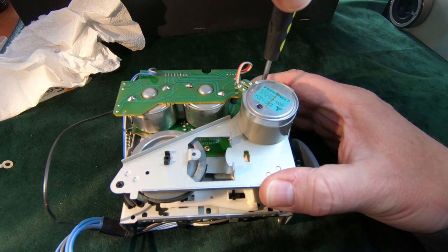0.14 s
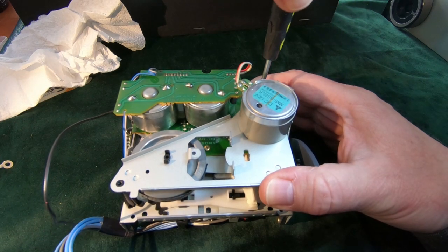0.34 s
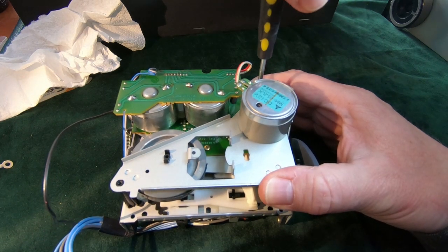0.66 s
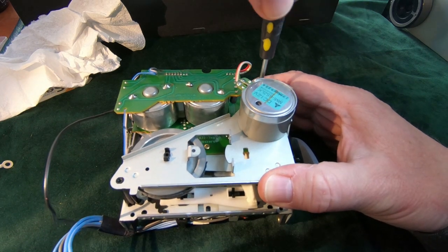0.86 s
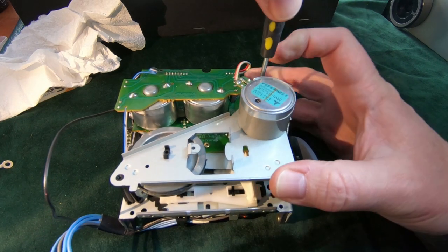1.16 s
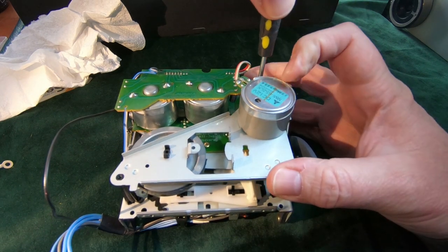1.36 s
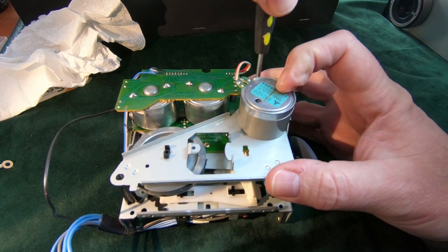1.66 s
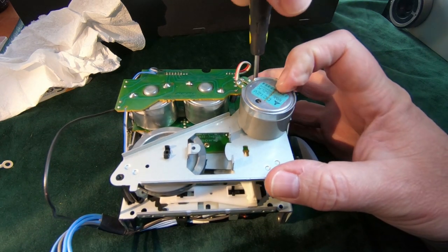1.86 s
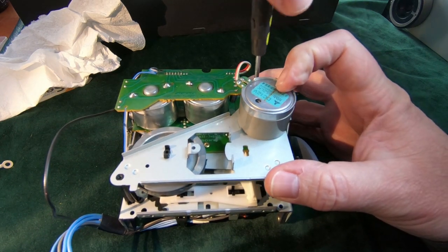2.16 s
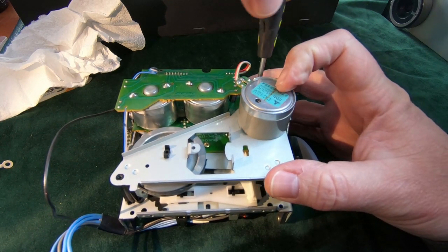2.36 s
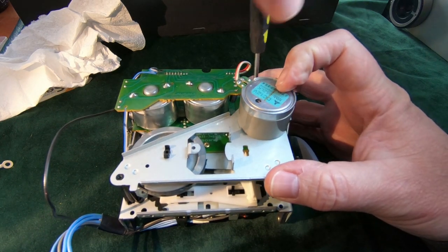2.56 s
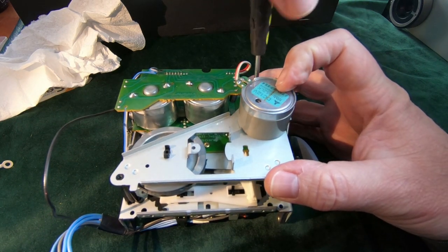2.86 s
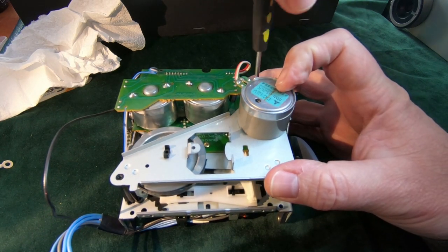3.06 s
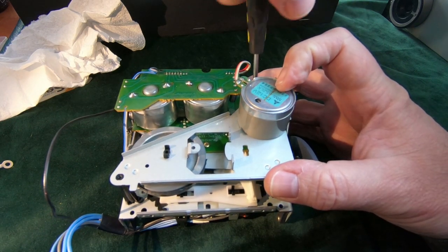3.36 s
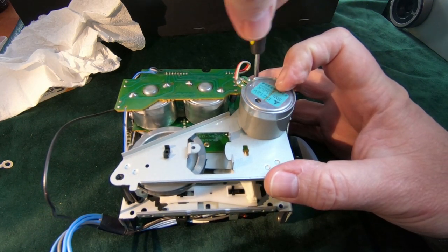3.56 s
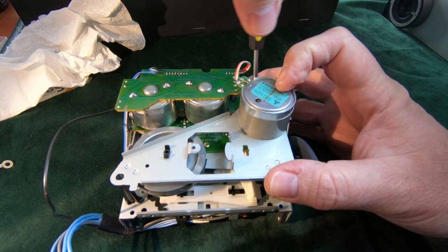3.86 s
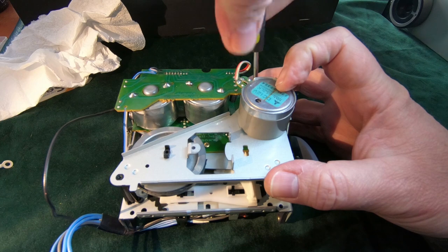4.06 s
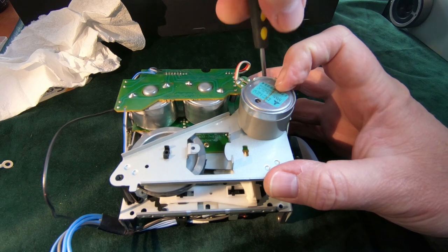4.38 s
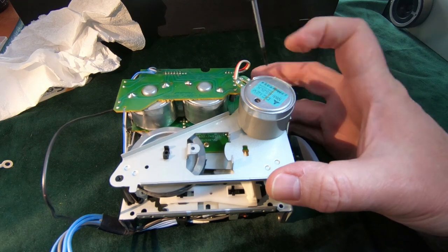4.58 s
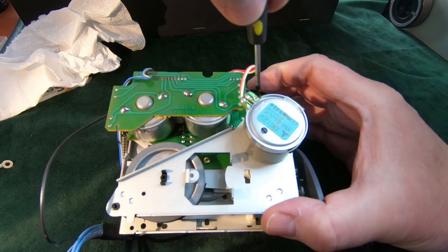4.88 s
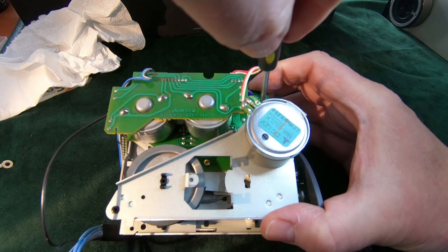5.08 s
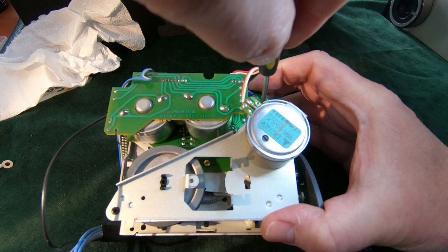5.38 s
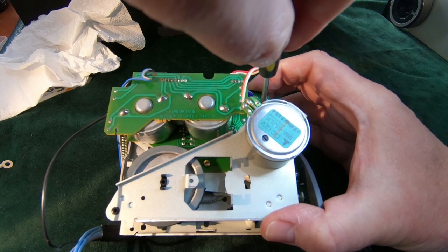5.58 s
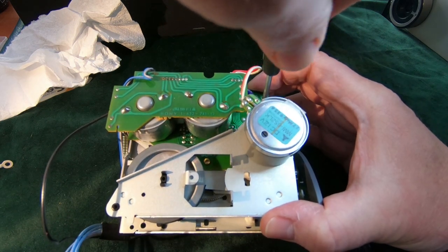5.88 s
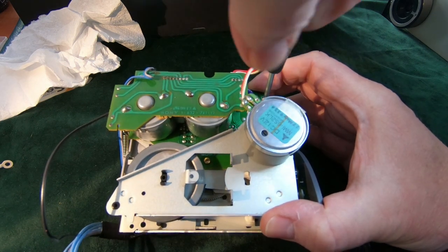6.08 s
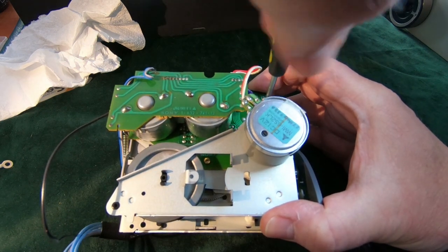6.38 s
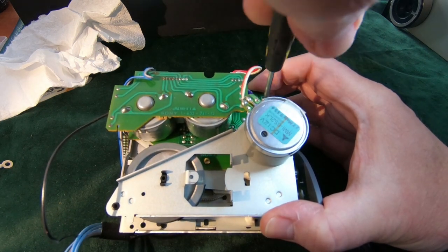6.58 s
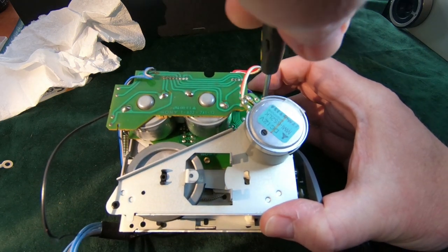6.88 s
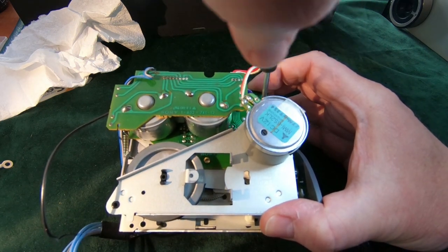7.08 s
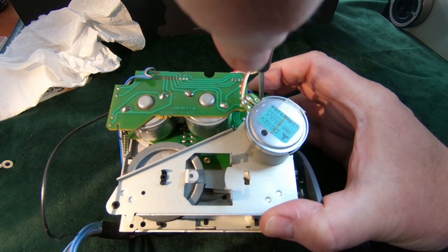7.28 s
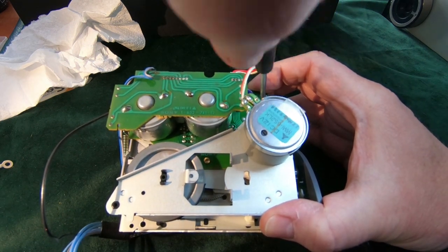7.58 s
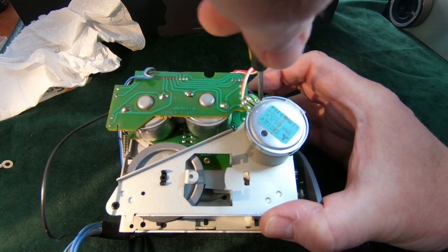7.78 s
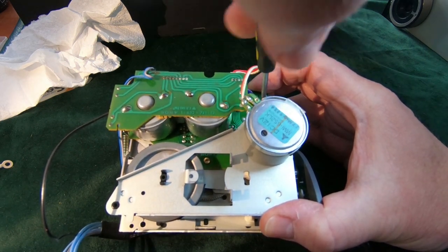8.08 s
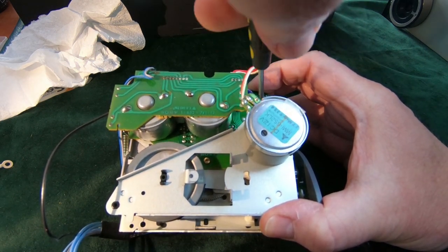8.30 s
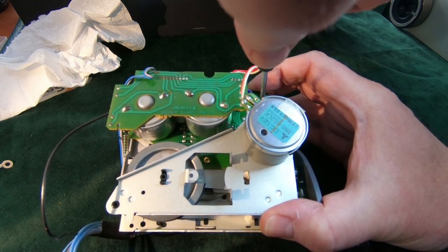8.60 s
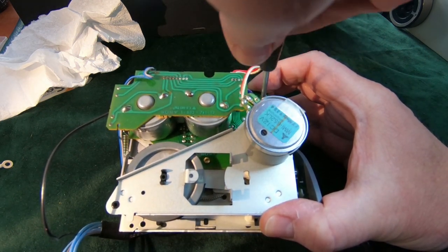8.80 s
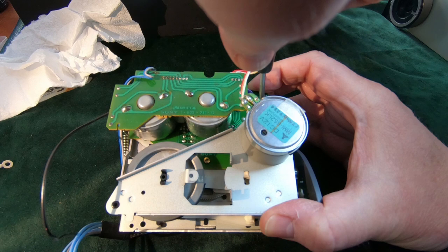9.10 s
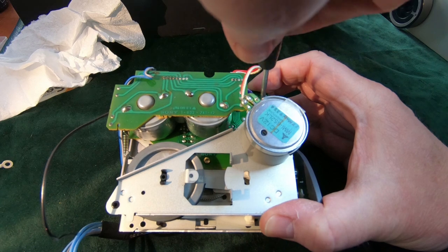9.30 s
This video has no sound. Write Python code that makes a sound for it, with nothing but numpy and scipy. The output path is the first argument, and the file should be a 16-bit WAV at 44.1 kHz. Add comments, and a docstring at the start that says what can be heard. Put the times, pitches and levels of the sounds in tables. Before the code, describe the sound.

A screwdriver works screws on a small metal tape mechanism, heard very close. An early click with a light knock leads to soft rhythmic finger rubbing. Near four seconds come a scraping slip, bright clacks and deep table bumps, the loudest moment. Afterwards mostly faint swishes, barely audible screw squeaks and occasional dull ticks, over a steady but fluttering low hum and gentle rumble in a small room.

```python
"""At a cloth-covered table, close to a stereo camera, a small screwdriver works the screws of a tape mechanism.
From the start a fan-like hum (wavering tone), room hiss (coloured noise) and stand rumble (low noise) lie underneath.
The tip soon skids (gritty noise ringing metal modes) and ticks (short contacts ringing them, answered by the room);
the table thuds up through the stand (damped low swings) and fingers rub round the handle (patchy hiss).
From about three seconds a screw squeaks at times (narrow noise); the heaviest thuds come just after four seconds."""
import sys
import numpy as np
from scipy import signal
from scipy.fft import rfft, irfft
from scipy.io import wavfile

SR = 44100
rng = np.random.default_rng(int(sys.argv[2]) if len(sys.argv) > 2 else 0)


def digitize_waveform(pressure):
    """Quantize a signal to 16-bit integers and store it at the path in sys.argv[1].

    Rows of a 2-D input are taken as channels; values are limited to [-1, 1].
    """
    field = np.atleast_2d(pressure).T
    bounded = np.clip(field, -1, 1)
    quanta = np.round(bounded * 32767).astype(np.int16)
    wavfile.write(sys.argv[1], SR, quanta)


N = 416744
T = np.arange(N) / SR


def undb(db):
    """Decibels to an amplitude factor."""
    return 10 ** (np.asarray(db) / 20)


def unit(x):
    """Scale to an overall RMS of one."""
    return x / np.sqrt(np.mean(x ** 2))


def band(x, lo_hz, hi_hz, passes=1):
    """Keep a band of frequencies; more passes make steeper edges."""
    sos = signal.butter(2, [lo_hz, hi_hz], "band", fs=SR, output="sos")
    return signal.sosfilt(np.tile(sos, (passes, 1)), x)


def panned(x, pan_db):
    """Place a sound by its level on the left minus that on the right."""
    return x * undb(np.array([pan_db / 2, -pan_db / 2]).reshape(2, -1))


def add(out, x, start_s):
    """Mix a short stereo sound in at a time."""
    i = int(start_s * SR)
    out[:, i:i + x.shape[1]] += x[:, :N - i]


def around(peak_s, length_s):
    """Samples within three lengths of a gesture's peak."""
    return slice(max(int((peak_s - 3 * length_s) * SR), 0), int((peak_s + 3 * length_s) * SR))


def swell(t, length_s, rise, drop_db):
    """Rounded gain that peaks at t = 0 and is drop_db down at either end of the length; rise is a share of it."""
    side = np.where(t < 0, -t / rise, t / (1 - rise))
    return undb(-drop_db * (side / length_s) ** 1.5)


def coloured(points):
    """Steady noise whose spectrum follows frequency and level points."""
    hz, db = np.transpose(points)
    log_hz = np.log(np.arange(N // 2 + 1) * SR / N + 1)
    spectrum = rfft(rng.standard_normal(N)) * undb(np.interp(log_hz, np.log(hz), db))
    return unit(irfft(spectrum, N))


# spectra of the room air, shared (mid) and opposed (side) at the two ports: (pitch_hz, relative level_db)
AIR_MID = [(22, -38.5), (50, -29), (80, -33.5), (110, -33), (145, -12.5), (165, -16), (187, -8.5),
           (210, -16.5), (235, -21), (270, -25), (500, -41), (830, -38), (1150, -45.5), (2500, -53.5),
           (4500, -58.5), (6800, -53.5), (9000, -58), (13000, -65)]
AIR_SIDE = [(25, -24), (53, -18), (114, -26), (144, -5), (180, -7.5), (325, -22), (400, -26.5), (440, -26),
            (860, -21.5), (1560, -36.5), (3500, -53), (7000, -47.5), (9500, -51), (13000, -59)]
AIR_MID_DB, AIR_SIDE_DB = -51.5, -51.5


def quiet():
    """Room air is steady noise, partly alike at both microphone ports and partly opposed."""
    mid = undb(AIR_MID_DB) * coloured(AIR_MID)
    side = undb(AIR_SIDE_DB) * coloured(AIR_SIDE)
    return np.array([mid + side, mid - side])


# one chance course of the hum's unsteady level, straight lines between points: (time_s, level_db)
HUM_COURSE = [(0.0, -51.5), (1.37, -44.5), (1.42, -51), (3.1, -49), (3.42, -61.5), (3.5, -38), (3.58, -51),
              (4.03, -41), (4.08, -52), (4.26, -44), (4.45, -69), (4.58, -42.5), (4.63, -61), (4.901, -38),
              (4.95, -53.5), (5.74, -44.5), (6.21, -61), (6.24, -43), (6.66, -71), (6.68, -48), (7.82, -49),
              (7.87, -56), (8.76, -44), (8.92, -55), (9.03, -44), (9.45, -60)]
HUM_HZ, HUM_DRIFT_HZ = 185.8, 1.96  # centre and RMS drift of the pitch
HUM_WAVER, HUM_WAVER_HZ = 0.41, 9.2  # RMS depth as a share of the tone, upper edge of its rates
HUM_HAZE_DB, HUM_HAZE_HZ = -15, 4.4  # level against the tone, reach on either side of it
HUM_PHASE_RAD = 0.4  # the left leads and the right lags by this much


def hum():
    """A tone that wavers at random in level and pitch, in a haze of narrow noise; it reaches the ports out of step."""
    time_s, level_db = np.transpose(HUM_COURSE)
    waver = 1 + HUM_WAVER * unit(band(rng.standard_normal(N), 2.33, HUM_WAVER_HZ))
    hz = HUM_HZ + HUM_DRIFT_HZ * unit(band(rng.standard_normal(N), 1.5, 6))
    phase = 2 * np.pi * np.cumsum(hz) / SR + HUM_PHASE_RAD * np.array([[1], [-1]])
    tone = np.sqrt(2) * np.sin(phase) / np.cos(HUM_PHASE_RAD)  # the sum of the ports keeps its level
    haze = unit(band(rng.standard_normal((2, N)), HUM_HZ - HUM_HAZE_HZ, HUM_HZ + HUM_HAZE_HZ))
    return undb(np.interp(T, time_s, level_db)) * (tone * waver + undb(HUM_HAZE_DB) * haze)


# hands pressing on the table: (peak_s, level_db, length_s, left_minus_right_db)
PRESSES = [(0.652, -64.5, 0.35, 2), (1.123, -61, 0.81, -17), (1.422, -54.5, 0.4, -2),
           (1.688, -57, 0.21, -14), (1.997, -65, 0.56, -22), (2.4, -64, 0.18, -4), (2.702, -47, 0.24, -5),
           (3.05, -49, 0.26, -11), (3.405, -53, 0.69, -8), (3.998, -41.5, 0.13, -10),
           (4.306, -25, .2, -9.5), (4.63, -47, 0.62, -13.5), (4.898, -38, 0.11, -9),
           (5.45, -55, 0.17, -7.5), (6.5, -67, 0.61, -11.5), (7.147, -53, 0.18, -5), (7.447, -54, 0.12, -3),
           (8.58, -78, 0.25, 5), (9.224, -69, 0.27, -9)]
PRESS_RISE, PRESS_DROP_DB = 0.31, 18  # share of the length before the peak; fall at either end
RESTING_DB, RESTING_PAN_DB = -65, -2


def rumble():
    """The stand rumbles faintly under resting hands and swells with each press."""
    low = np.array([unit(band(band(rng.standard_normal(N), 24, 60), 4.2, 69)) for _ in range(2)])
    gain = panned(np.full(N, undb(RESTING_DB)), RESTING_PAN_DB)
    for peak_s, level_db, length_s, pan_db in PRESSES:
        i = around(peak_s, length_s)
        press = undb(level_db) * swell(T[i] - peak_s, length_s, PRESS_RISE, PRESS_DROP_DB)
        gain[:, i] += panned(press, pan_db)
    return gain * (low + 0.25 * low[::-1])  # each port picks up some of the other


def grit(count, spread_db):
    """Noise of uneven 32-sample grains, as asperities catch and slip."""
    grains = undb(spread_db * rng.exponential(size=count // 32 + 1))
    return unit(rng.standard_normal(count) * np.repeat(grains, 32)[:count])


PORT_LAG_S, PORT_OWN = .000025, 0.36  # delay on the right; noise opposed at the ports against shared noise


def at_ports(force):
    """Two noises that the ports partly share; the right port hears the work a little later."""
    both = force[0] + PORT_OWN * np.array([force[1], -force[1]])
    i = np.arange(force.shape[1])
    return np.array([both[0], np.interp(i - PORT_LAG_S * SR, i, both[1])])


# registers of the metalwork, from chassis boom to top sizzle: (low_hz, high_hz)
REGISTERS = [(550, 1400), (1400, 2080), (2080, 4800), (4800, 8100), (8100, 15000)]
REGISTER_FILTERS = [signal.butter(3, edges, "band", fs=SR, output="sos") for edges in REGISTERS]


def registers(x):
    """Split into registers that stay in step with each other, by filtering forwards and backwards."""
    return [signal.sosfiltfilt(sos, x) for sos in REGISTER_FILTERS]


def balance(x, levels_db, count, pans_db=np.zeros(5)):
    """Give each register the energy of its level held for count samples, and its place between the ports."""
    total = 0
    for level_db, part, pan_db in zip(levels_db, registers(x), pans_db):
        gain = np.sqrt(count / np.sum(part.mean(axis=0) ** 2))
        total = total + panned(undb(level_db) * part * gain, pan_db)
    return total


# modes of the metalwork, before chance and damping: (pitch_hz, level_db, t60_s)
METAL = [(651, -10.5, 0.0079), (893, -7, .02), (1280, 2.5, 0.032), (1756, 3, 0.013), (2197, -2, 0.027),
         (2474, 2, 0.014), (2940, -2.5, 0.016), (3180, 0, 0.0086), (3600, 5, 0.011), (4460, -4.5, .015),
         (5400, -11.5, 0.016), (5983, -4.5, .014), (6330, -4, 0.011), (6820, -1.5, 0.0148),
         (7660, -3, .012), (9295, 0, 0.0067), (10730, 3, .008), (12400, 1.5, .006), (14400, -4.5, .005)]


def ring(force, damp):
    """A rough force rings the metal modes, a little differently each time; damp scales their ring times."""
    x, chance = 0, rng.standard_normal((len(METAL), 2))
    for (hz, db, t60), (pitch_chance, level_chance) in zip(METAL, chance):
        r = np.exp(-np.log(1000) / (t60 * damp * SR))
        w = 2 * np.pi * hz * (1 + .02 * pitch_chance) / SR
        mode = signal.lfilter([1], [1, -2 * r * np.cos(w), r * r], force)
        x = x + undb(db + 3 * level_chance) * np.sqrt(1 - r) * np.sin(w) * mode
    return x


STRIKE_DAMP = 0.69  # the hand shortens the rings
FAVOUR_DB, RANK_DB = 9, 1.5  # loudest ring on the scale of the modes; each further one is weaker by this
SCATTER_DB = 1  # chance in each mode's level


def strike(push, rings_hz):
    """The modes swell with the push and die away; where the tip lands pulls a few to their pitch and lifts them."""
    hz, db, t60 = np.transpose(METAL)
    chance = rng.standard_normal((len(hz), 2))
    hz, db = hz * (1 + 0.019 * chance[:, 0]), db + SCATTER_DB * chance[:, 1]
    near = np.abs(np.log(hz[:, None] / rings_hz)).argmin(axis=0)
    hz[near], db[near] = rings_hz, FAVOUR_DB - RANK_DB * np.arange(len(near))
    decays = np.exp(-np.log(1000) / (t60 * STRIKE_DAMP * SR))
    shapes = np.array([signal.lfilter([1], [1, -decay], push) for decay in decays])
    shapes = shapes / shapes.max(axis=1, keepdims=True)
    tones = np.sin(2 * np.pi * (hz[:, None] * T[:len(push)] + rng.random((2, len(hz), 1))))
    return (undb(db)[:, None] * shapes * tones).sum(axis=1)


# tip skids, register levels before the rise and fade: (start_s, chassis_boom_db, plate_knock_db,
# bracket_clack_db, screw_ring_db, top_sizzle_db, rise_s, fade_t60_s)
SKIDS = [(0.166, -80, -63, -60, -56, -58, 0.014, 0.092), (1.014, -66, -83, -56.5, -62, -83, 0.0035, 0.12),
         (1.114, -58, -56, -40.5, -40, -42.5, 0.023, 0.13),
         (3.695, -35, -32, -31.5, -36, -59.5, 0.014, 0.29), (3.962, -49, -56, -48, -46, -61, 0.02, 0.203),
         (7.385, -56, -61, -51, -53.5, -70, 0.031, 0.26), (8.288, -72, -63, -51, -69, -78.5, 0.044, 0.19)]
DRONE_DB, DRONE_T60_S = 4, 1  # the table against the chassis boom, and its own fade on top of the skid's


def skids():
    """The blade slides off a screw head: dense grains, damped by the pressure; the table drones with the chassis."""
    out, t = np.zeros((2, N)), T[:14000]
    for start_s, *levels_db, rise_s, t60 in SKIDS:
        force = at_ports(np.array([grit(len(t), 1.9) for _ in range(2)]))
        metal = balance(ring(force, 0.34), levels_db, count=len(t))
        drone = undb(levels_db[0] + DRONE_DB - 60 * t / DRONE_T60_S) * unit(band(force, 137, 840))
        shape = (1 - np.exp(-t / rise_s)) * undb(-60 * t / t60)
        add(out, panned((metal + drone) * shape, .5), start_s)
    return out


# the room's fade time in each register, boom to sizzle: (t60_s)
ROOM_T60_S = [0.25, 0.29, 0.27, 0.27, 0.29]
# spectrum of the room's answer: (pitch_hz, level_db)
ROOM_COLOUR = [(500, 0), (2000, -2), (3000, -0.5), (4200, -3), (5400, -7.5), (6500, 0.5), (7600, -3.5),
               (9000, 2.5), (16000, -1.5)]
ROOM_DB = -13


def room(x):
    """Diffuse answer of a small furnished room: it sets in after a few ms and fades by register."""
    t, noise = T[:12000], rng.standard_normal((2, 12000))
    hz, db = np.transpose(ROOM_COLOUR)
    log_hz = np.log(np.arange(6001) * SR / 12000 + 1)
    noise = irfft(rfft(noise) * undb(np.interp(log_hz, np.log(hz), db)))
    tail = sum(undb(-60 * t / t60) * part for t60, part in zip(ROOM_T60_S, registers(noise)))
    onset = np.clip((t - .004) / 0.007, 0, 1)
    tail = undb(ROOM_DB) * tail * onset / np.sqrt(8 * SR // 1000)
    return signal.fftconvolve(x[None], tail, axes=1)


# tip ticks: (start_s, level_db, rings_hz with the loudest first, brightness_db per register,
# focus_db on the middle register, contact_ms, left_minus_right_db before the register's own place)
TICKS = [(0.1824, -58.5, 6200, 8, 0, 0.82, 1), (0.514, -74, 1840, -7, 1, 5.5, 1),
         (0.538, -72, 2900, 0, 0, 6, -10), (0.5476, -36.5, (2700, 3230, 6460, 6950), 4.5, 5.5, 7.5, 0),
         (1.015, -67.5, 3580, 0.5, -0.5, 11, -3), (1.084, -73, 4300, 2, 0, 5.4, 1.2),
         (1.1162, -61, 5540, 4, -1.5, 5.6, -1), (1.129, -62, 6340, 8, 7, 3.7, 1),
         (1.141, -64, 6240, 5, 7, 5.2, 6), (1.301, -86, 7240, 3, -5, 4.8, 4),
         (1.3728, -66.5, 6760, 11, 3.5, 1.6, 2), (2.727, -69, 6640, 1.5, 2, 4.2, 2),
         (3.034, -70.5, 2110, -6, 3, 2.2, -1), (3.694, -51.5, 3140, -5.5, 10, 11, -20),
         (3.9022, -61, 3650, 0, 1, 6.7, 1), (3.9165, -47, (2412, 2300, 3900), -1, 2, 5.2, 1),
         (3.9748, -53, (1500, 2000, 2800), -5, 6, 4.4, -7), (3.9836, -42, (3700, 1910, 7640, 1410, 4380),
         0.5, 2.5, 3.2, -1), (3.9931, -42, (1240, 1860, 3840, 4350), -3, 3.5, 1.3, 3),
         (4.2527, -39.5, (6026, 7340, 5290, 4680), 2, 0.5, 3.5, -2.5), (4.2619, -46.5, (9100, 5600, 2200),
         12.5, 6, 2.5, 8), (4.27, -57, (6600, 7500), 7, 0, 2.6, 3), (4.2737, -32, (3527, 1774, 2480, 1210),
         0.5, 1, 3.6, 2), (4.3583, -51, (2530, 6000), 5, 7, 3.6, 1), (4.38, -67.5, 6260, 7, 1.5, 2.5, 1),
         (4.542, -72, 6440, 3, 6, 4.1, -2), (4.737, -78, 4100, -2.5, 3.5, 7.2, -1.5),
         (4.769, -59.5, 5690, 7, 3, 0.66, 5.5), (4.8612, -68, (1250, 430), -10.5, 3, 8.6, -3.5),
         (5.369, -61, 1800, -6, 3, 5.5, 3.5), (5.4, -71.5, 3800, 0.5, -1, 5.2, -1),
         (5.4112, -62.5, 7350, 0.5, 0, 3.2, 2), (5.462, -78, 4000, 3, 4, 2.6, -2),
         (5.5168, -67, 6800, -1, -1, 1.9, 1), (5.598, -71.5, 7550, 4, 1.5, 6, 0.5),
         (6.894, -70, 7240, 1, 1, 9.8, -3.5), (7.106, -74, 1280, -2.5, 1.5, 4.2, -2),
         (7.409, -55, (3618, 910, 7500, 1800), -1.5, 1.5, 7.2, -6), (7.418, -50, (1810, 2950, 875, 5930),
         -1, 1.5, 5.5, -1), (8.298, -62, (890, 1700, 3400), -5.5, 3.5, 5.7, -4.5),
         (8.3238, -67, (1787, 850, 2500), -6.5, 3.5, 5, -4.5), (8.34, -58, (1820, 3300, 2200),
         -5, 11, 2.9, -1), (8.525, -53, (6980, 1310, 787, 3470, 5986), -0.1, -0.5, 2.6, -1.5),
         (9.0385, -53.5, (1800, 952, 2690, 6900), 1, -0.5, 5.5, 1), (9.138, -59.5, (3680, 850, 1720, 2573),
         -3, 1, 4.5, 0), (9.2598, -48.5, (1850, 2370, 840, 3520), -1, 0.9, 2.4, -1.5)]
# a typical tick in each register, boom to sizzle: (relative level_db)
TICK_COLOUR_DB = [2, -0.5, 2, 3.5, -10]
# place of each register of a tick, boom to sizzle: (left_minus_right_db)
REGISTER_PAN_DB = [-3.5, -3, 0, -0.5, 5.5]
FAVOUR_REGISTER_DB = 3.5  # lift of the loudest ring's register
RATTLE_DB = -8.5  # loose rattle against the rings
CRACK_DB, CRACK_FULL_MS = -6, 2.5  # crack against the rings at this contact time; shorter contacts crack more
WALL_S, WALL_DB = 0.011, -18
ROOM_RINGS = 0.32  # gain of the rings in what the room takes up
LEAD_S = .004  # silence ahead of the contact, room for the two-way filters


def ticks():
    """A broad crack and a brief contact that swells and lets go ring the metal; a near wall returns them once."""
    out, t, step = np.zeros((2, N)), np.maximum(T[:1700] - LEAD_S, 0), np.arange(5) - 2
    count = 8 * SR // 1000  # levels are held for 8 ms
    click = signal.unit_impulse(len(t), int(LEAD_S * SR))[None]  # the even part of what the room takes up
    for start_s, level_db, rings_hz, bright_db, focus_db, ms, pan_db in TICKS:
        rings_hz = np.atleast_1d(rings_hz) * 1.
        levels_db = level_db + np.array(TICK_COLOUR_DB) + bright_db * step - focus_db * step ** 2
        levels_db = levels_db + [FAVOUR_REGISTER_DB * (lo <= rings_hz[0] < hi) for lo, hi in REGISTERS]
        u = t / (max(ms, .5) / 9000)
        push = u ** 2 * np.exp(-u)
        crack = rng.standard_normal((2, len(t))) * push
        rattle = undb(RATTLE_DB) * unit(ring(crack, 0.076))
        x = unit(strike(push, rings_hz)) + rattle + undb(CRACK_DB) * CRACK_FULL_MS / ms * unit(crack)
        x = balance(at_ports(x), levels_db, count, pans_db=pan_db + np.array(REGISTER_PAN_DB))
        lead_s = start_s - LEAD_S
        add(out, x, lead_s)
        add(out, undb(WALL_DB) * band(x[::-1], 500, 7500), lead_s + WALL_S)  # sides swapped
        taken_up = ROOM_RINGS * x.mean(axis=0) + balance(click, levels_db, count)[0]
        add(out, room(taken_up), lead_s)
    return out


# thuds through table and stand: (start_s, level_db before rise and fade, pitch_hz, rise_swings, t60_s,
# left_minus_right_db)
THUDS = [(0.516, -31.5, 173.3, 0.3, 0.23, 4), (0.552, -39.5, 294, 0.1, 0.12, 2),
         (2.67, -41.5, 63.5, 0.48, 0.26, -14), (3.695, -31, 445, 0.5, 0.06, 8),
         (3.704, -33, 650, 2, 0.063, 3), (3.901, -30, 145, 0.73, 0.2, -4),
         (3.972, -27.5, 161.7, 0.2, 0.22, 0), (4.255, -10, 123, 0.18, 0.042, 0),
         (4.268, -22.5, 69.5, 0.11, 0.2, -18), (4.2811, -11.5, 50.7, 0.11, 0.045, -4),
         (4.324, -26, 64, 0.092, 0.15, -27.5), (4.286, -22, 135, 0.54, 0.14, -8),
         (4.295, -26, 244, 0.25, 0.073, -4), (4.367, -9, 55.5, 0.64, 0.076, -13.5),
         (4.421, -28.5, 230.5, 4, 0.12, -16.5), (4.44, -29.5, 134, 0.99, 0.099, -12.5),
         (4.576, -38, 151, 1.1, 0.15, -9.5), (4.862, -18, 165.4, 1.45, 0.075, -15),
         (4.867, -26, 443, 2.5, 0.024, -10), (4.887, -22, 75.4, 0.28, 0.075, -11.5),
         (7.41, -31, 268, 0.71, 0.033, 6), (9.038, -43, 320, 0.6, 0.098, 2),
         (0.551, -41.5, 700, 0.45, 0.047, -6), (9.054, -39, 193, 1.5, .1, -7),
         (9.261, -34.5, 142.6, 0.9, 0.18, -3)]


def thuds():
    """The table and stand swing low and damped after each knock, the left port trailing the right."""
    out, t = np.zeros((2, N)), T[:14000]
    for start_s, level_db, hz, rise, t60, pan_db in THUDS:
        swing = np.sin(2 * np.pi * hz * t - np.array([[.6], [0]]))  # lag in radians
        shape = (1 - np.exp(-(t * hz / rise) ** 2)) * undb(level_db - 60 * t / t60)
        add(out, panned(swing * shape, pan_db), start_s)
    return out


PATCHY_DB, PATCHY_HZ = 2, 21.34  # RMS wander of each slice, upper edge of its rates


def wander():
    """A slow random course, held for 64 samples at a time."""
    slow = band(rng.standard_normal(N // 64 + 1), 64, 64 * PATCHY_HZ)  # from 1 Hz at the held rate
    return np.repeat(unit(slow), 64)[:N]


def patchy(hiss, edges_hz):
    """Neighbouring slices of a hiss, each with its own wandering level."""
    slices = zip(edges_hz, edges_hz[1:])
    return unit(sum(undb(PATCHY_DB * wander()) * band(hiss, lo, hi, passes=2) for lo, hi in slices))


# finger strokes round the handle: (peak_s, bright_hiss_db, lower_hiss_db against the bright, length_s)
STROKES = [(0.763, -69, -14, 0.03), (0.89, -69, -10, 0.38), (1.235, -74.5, -2, 0.53),
           (1.74, -75, -17, 0.12), (1.916, -64, -11, 0.053), (1.971, -63.5, -9, 0.054),
           (2.175, -72, -4, 0.22), (2.333, -70.5, -12.5, 0.12), (2.484, -69.5, -6, 0.14),
           (2.627, -67.5, -11, 0.12), (2.8, -70, -3, 0.19), (2.938, -62.5, -11, 0.072),
           (3.07, -69.5, -2.5, 0.4), (3.26, -66, -8, 0.14), (3.394, -65.5, -2, 0.2),
           (3.515, -68, -7, 0.053), (3.69, -62.5, -3, 0.39), (3.88, -77, 2, 0.34), (4.055, -67, -7, 0.073),
           (4.254, -63.5, -4, 0.2), (4.44, -84, 2, .1), (4.72, -71, -7.5, .08), (4.796, -76, 3, 0.2),
           (4.928, -82, -4, 0.074), (6, -70.5, -11.5, 0.084), (6.118, -61.5, -9, 0.093),
           (6.267, -68.5, -6, 0.19), (6.446, -66.5, -5.5, 0.081), (6.582, -65.5, -5.5, 0.15),
           (6.736, -71, -7, 0.088), (6.88, -63.5, -5, 0.091), (7.027, -67.5, -7, 0.11),
           (7.155, -66, -3.5, 0.15), (7.378, -72, 0, 0.087), (7.679, -68, 0, 0.16), (7.85, -74, -7, 0.062),
           (7.974, -64.5, -5, 0.086), (8.261, -67, 0.5, 0.11), (8.598, -74, -17.5, 0.13)]
STROKE_RISE, STROKE_DROP_DB = 0.28, 11  # share of the length before the peak; fall at either end


def rub():
    """Fingers catch and slip on the handle: soft swishes of gritty hiss in two bands, with a thin top."""
    bright, lower = np.zeros(N), np.zeros(N)
    for peak_s, level_db, lower_db, length_s in STROKES:
        i = around(peak_s, length_s)
        shape = swell(T[i] - peak_s, length_s, STROKE_RISE, STROKE_DROP_DB)
        bright[i] += undb(level_db) * shape
        lower[i] += undb(level_db + lower_db) * shape
    hiss = at_ports(np.array([grit(N, 1.82) for _ in range(2)]))
    thin_top = undb(-10.5) * unit(band(hiss, 6600, 15000))
    upper_hiss = patchy(hiss, [4770, 5980, 7360, 7880]) + thin_top
    lower_hiss = patchy(hiss, [1880, 2533, 3270, 4000, 5240])
    return bright * upper_hiss + lower * lower_hiss


# the screw squeaks in its thread: (peak_s, level_db, pitch_hz, length_s)
SQUEAKS = [(3.143, -74, 2450, .06), (3.432, -71, 2300, .07), (6.896, -64, 3230, .04), (6.9, -65, 4600, .03),
           (6.913, -69, 2620, 0.044), (7.167, -69.5, 3100, .09), (7.172, -61, 7200, 0.03),
           (7.205, -71, 2600, 0.055), (7.993, -68, 2830, 0.07)]
SQUEAK_WIDTH_HZ = 320


def squeaks():
    """The screw in its thread gives narrow rough whistles, bands of noise that swell and fade."""
    out, t = np.zeros((2, N)), T[:12000]
    middle_s = t.mean()
    for peak_s, level_db, hz, length_s in SQUEAKS:
        noise = at_ports(rng.standard_normal((2, len(t))))
        whistle = unit(band(noise, hz - SQUEAK_WIDTH_HZ / 2, hz + SQUEAK_WIDTH_HZ / 2))
        shape = swell(t - middle_s, length_s, STROKE_RISE, STROKE_DROP_DB)
        add(out, undb(level_db) * whistle * shape, peak_s - middle_s)
    return out


LOW_PASS_HZ = 13380


def scene():
    """All the sounds at the two ports; skids, rubbing and air are softened by a low-pass."""
    low_pass = signal.butter(8, LOW_PASS_HZ, fs=SR, output="sos")
    soft = signal.sosfilt(low_pass, quiet() + skids() + rub())
    return soft + hum() + rumble() + ticks() + thuds() + squeaks()


# dips in the microphones' response: (low_hz, high_hz, share taken away)
MIC_DIPS = [(4660, 5670, 0.22), (8160, 9100, 0.13)]
TOP_HZ = 16400


def record(dry):
    """The microphones dip in two treble bands; the camera cuts the top."""
    for lo, hi, share in MIC_DIPS:
        dry = dry - share * band(dry, lo, hi)
    return signal.sosfilt(signal.ellip(10, .2, 70, TOP_HZ, fs=SR, output="sos"), dry)


dry = scene()
out = record(dry)
digitize_waveform(out)
```